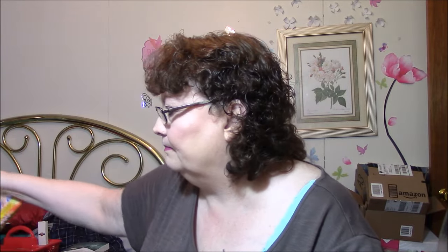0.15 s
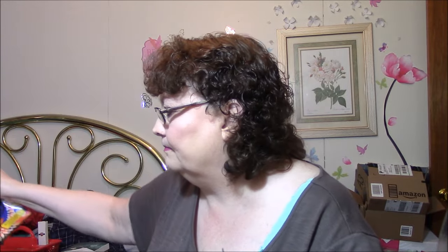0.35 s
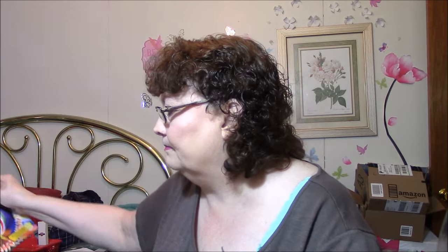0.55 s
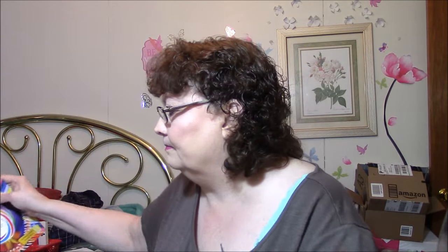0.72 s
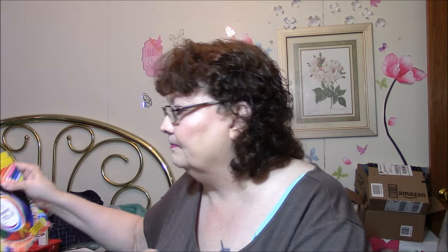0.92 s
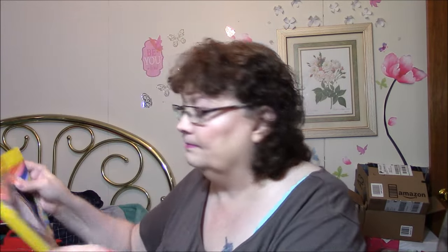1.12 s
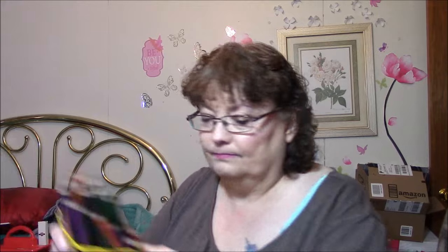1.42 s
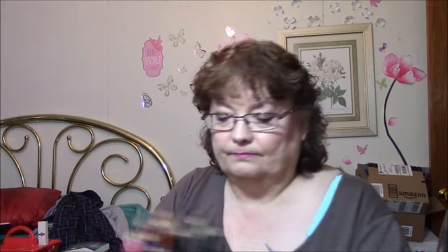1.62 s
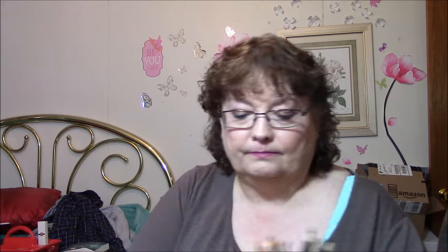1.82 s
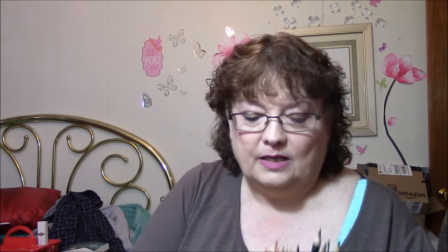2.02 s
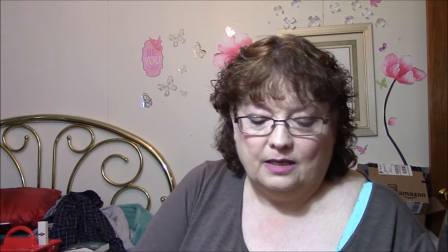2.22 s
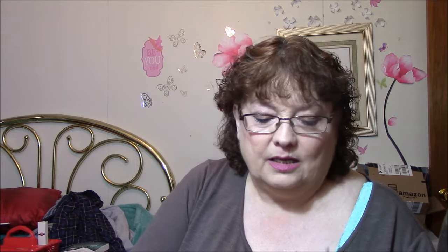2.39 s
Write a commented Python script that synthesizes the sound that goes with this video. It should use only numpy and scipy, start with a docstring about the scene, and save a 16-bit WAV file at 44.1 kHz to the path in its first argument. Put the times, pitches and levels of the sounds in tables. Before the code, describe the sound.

Wooden pencils knock softly in a scuffing pack for the first 0.3 seconds. A lull follows, with faint sleeve rustle and low room rumble. A soft bump comes at 1.2 seconds, then sharp plastic ticks from 1.4 as the pencils slide out and jostle. They clack loudest, close to the microphone, from 2.1 to 2.3 seconds, with a few lighter clicks around 2.5.

```python
"""Picking up a pack of pencils

At arm's length a pack of wooden pencils is dragged off a pile and lifted, with one soft bump.
Its plastic ticks; close to the microphone the pencils slide out, jostle and clack in the hand.
A small furnished room answers, over a low rumble, a rustling sleeve and a faint electrical whine."""
import sys
import numpy as np
from scipy import signal
from scipy.fft import rfft, irfft, next_fast_len
from scipy.io import wavfile
from scipy.ndimage import uniform_filter1d, map_coordinates

SR = 44100
rng = np.random.default_rng(int(sys.argv[2]) if len(sys.argv) > 2 else 0)


def generate_wav(signal):
    """Clip the signal to [-1, 1] and save it as 16-bit WAV at the path in sys.argv[1]."""
    frames = np.transpose(np.atleast_2d(signal))
    scaled = np.clip(frames, -1, 1) * 32767
    pcm = np.round(scaled).astype(np.int16)
    wavfile.write(sys.argv[1], SR, pcm)


N = 112454
TIME = np.arange(N) / SR
RING = np.arange(SR // 4) / SR  # seconds since a blow
FLOOR_DB = -53.5
PACK_MODE_WIDTH = 0.024  # fraction of a mode's frequency

# bending modes of a pencil: pitch_hz, level_db, t60_s
PENCIL_MODES = [(399, -17.5, 0.031), (888, -14.5, 0.068), (1380, -1, 0.024), (2539, -7.5, 0.033),
                (3540, -13, 0.021), (4570, -33, 0.016), (6590, -16.5, 0.021)]
# modes of the pack with the pencils inside: pitch_hz, level_db, t60_s
PACK_MODES = [(420, -5.5, .07), (925, -3, 0.063), (1650, -4.5, 0.052), (2625, -1, 0.051),
              (6770, -16.5, 0.033), (7500, -21, 0.03), (9730, -21, .03)]
# friction noise of the pack: frequency_hz, level_db
SCUFF_SPECTRUM = [(60, -30), (217, -3), (950, -4.5), (2700, -8), (5500, -18.5), (7500, -23.5), (16000, -40)]
# the room's low rumble: frequency_hz, level_db
FLOOR_SPECTRUM = [(25, -31.5), (125, -4), (330, -8.5), (1400, -19.5), (3100, -27), (6000, -29),
                  (16000, -43.5)]


def amp(db):
    return 10 ** (np.asarray(db) / 20)


def unit(x):
    return x / np.sqrt(np.mean(x ** 2) + 1e-20)


def fade(t, t60):
    """Falls by 60 dB in t60."""
    return np.exp(-np.log(1000) * t / np.maximum(t60, 1e-4))


def onset(t, rise_s=0.00015):
    """Wood gives a little as it is struck."""
    return 1 - np.exp(-t / rise_s)


def along(points, hz):
    """Interpolates (frequency_hz, value) points on a log axis."""
    f, v = np.transpose(points)
    return np.interp(np.log(hz + 1), np.log(f + 1), v)


def level(rows):
    """Gain per sample from (time_s, level_db) points."""
    return amp(np.interp(TIME, *np.transpose(rows)))


def filtered(x, response):
    """Applies a frequency response to x."""
    n = x.shape[-1]
    padded = next_fast_len(n + 4096)
    return irfft(rfft(x, padded) * response(np.fft.rfftfreq(padded, 1 / SR)), padded)[..., :n]


def noise(spectrum, size=N):
    """Coloured noise of rms 1."""
    return unit(filtered(rng.standard_normal(size), lambda hz: amp(along(spectrum, hz))))


def grain(rate, depth_db):
    """A random gain of rms 1, with rate knots a second."""
    knots = rng.standard_normal(int(N * rate / SR) + 4)
    return unit(amp(depth_db * map_coordinates(knots, [TIME * rate])))


def add(track, start_s, sound):
    i = int(np.clip(round(start_s * SR), 0, N))
    track[i:i + len(sound)] += sound[:N - i]


def tilt(hz, bright_db):
    """Gain of a slope in dB per octave around a pencil's main mode."""
    return amp(bright_db * np.log2(np.clip(hz, 700, 7000) / 1400))


def resonance(modes, peak_db, width):
    """A flat response plus a peak of relative width at each mode."""
    return lambda hz: 1 + amp(peak_db) * sum(1 / (1 + ((hz / f - 1) / width) ** 2) for f, _, _ in modes)


def ringing(modes, pitch, bright_db, t, scatter=0.041):
    """Each blow meets another pencil or another spot, so every mode shifts a little."""
    hz, db, t60 = np.transpose(modes)[:, :, None]
    signs = (-1) ** np.arange(len(hz))[:, None]
    gains = amp(db + rng.uniform(-2, 2, hz.shape)) * tilt(hz, bright_db) * signs
    shifted_hz = hz * pitch * (1 + scatter * rng.uniform(-1.01, 1, hz.shape))
    return np.sum(gains * np.sin(2 * np.pi * shifted_hz * t) * fade(t, t60), axis=0)


def rumble(gain_db=0):
    """Steady room tone, mostly bass."""
    return amp(FLOOR_DB + gain_db) * noise(FLOOR_SPECTRUM)


def whine(pitch_hz=5575):
    """A thin electrical whine comes and goes unevenly."""
    # spells of whine: start_s, end_s, level_db
    spells = [(0.234, 0.374, -65), (0.583, 0.649, -60.5), (0.718, .79, -62), (0.85, .92, -62.5),
              (1.115, 1.259, -66)]
    gate = sum(amp(db) * ((TIME >= start) & (TIME < end)) for start, end, db in spells)
    tone = np.sin(2 * np.pi * pitch_hz * TIME)
    return uniform_filter1d(gate, size=300) * tone * grain(rate=30, depth_db=1)


def room(x, tail_db=-15.5, walls_db=-11.5):
    """A small furnished room: echoes off near walls and a short diffuse tail."""
    # decay of the room: frequency_hz, t60_s
    decay = [(150, 0.39), (4000, 0.14), (12000, 0.033)]
    hz, t, bands = signal.stft(rng.standard_normal(SR // 2), SR, nperseg=256)
    tail = signal.istft(bands * fade(t, along(decay, hz)[:, None]), SR, nperseg=256)[1]
    walls = np.zeros(len(tail))
    for when, strength in rng.uniform(-1, 1, (12, 2)):
        delay_s = 0.002 + abs(when) * 0.02
        walls[int(delay_s * SR)] += strength
    late = amp(tail_db) * np.roll(tail, SR // 200) / np.linalg.norm(tail)
    early = amp(walls_db) * walls / np.linalg.norm(walls)
    return signal.fftconvolve(x, late + early)[:N]


def sleeve():
    """Cloth rustles as the arm moves."""
    # swell of the rustle: time_s, level_db
    movement = [(.48, -52.5), (.68, -66.5), (.84, -53.5), (.96, -78)]
    # rubbing cloth: frequency_hz, level_db
    cloth = [(30, -28), (130, -2.5), (2600, -14), (16000, -50)]
    return level(movement) * noise(cloth) * grain(rate=40, depth_db=1.5)


def pack_scuffs():
    """The pack scuffs over the pile, then its plastic flexes briefly; both excite its modes."""
    # scuffs and the closing flex: peak_s, level_db, rise_s, t60_s
    strokes = [(0.026, -33.5, 0.073, 0.31), (0.065, -33, 0.015, 0.22), (0.131, -37, 0.013, 0.27),
               (0.187, -34.5, 0.022, 0.21), (0.771, -45.5, 0.0031, 0.28), (1.45, -34, .002, 0.085)]
    power = np.zeros(N)
    for peak_s, db, rise_s, t60 in strokes:
        swell = np.exp(np.minimum(TIME - peak_s, 0) / rise_s)
        power += (amp(db) * swell * fade(np.maximum(TIME - peak_s, 0), t60)) ** 2
    body = resonance(PACK_MODES, peak_db=-5.5, width=PACK_MODE_WIDTH)
    rasp = unit(filtered(noise(SCUFF_SPECTRUM), body))
    return np.sqrt(power) * rasp * grain(rate=500, depth_db=3)


def pack_knocks(grit_db=-1.5):
    """Pencils knock inside the pack and ring it, each with a burst of contact noise."""
    # knocks: start_s, level_db, brightness_db_per_octave
    knocks = [(.022, -31.5, -3), (0.06, -35, 5.5), (.066, -30, -1.5), (0.075, -34, -2), (0.13, -43, 8.5),
              (.187, -29, 0), (.299, -45, -8), (0.768, -47.5, 4.5), (1.46, -33, -2)]
    out = np.zeros(N)
    for start_s, db, bright_db in knocks:
        grit = filtered(noise(SCUFF_SPECTRUM, size=len(RING)), lambda hz: tilt(hz, bright_db))
        grit *= amp(grit_db) * fade(RING, t60=0.018)
        pitch = 1 + PACK_MODE_WIDTH * rng.uniform(-0.63, 0.69)
        ring = ringing(PACK_MODES, pitch, bright_db, RING)
        add(out, start_s, amp(db) * (ring + grit) * onset(RING))
    return out


def pack_thump(start_s=1.222, gain_db=-24.5):
    """A soft blow against the pack rings only low modes."""
    # low modes: pitch_hz, level_db, t60_s
    modes = [(307, 2, 0.048), (192, -15.5, 0.12)]
    ring = sum(amp(db) * np.sin(2 * np.pi * hz * RING) * fade(RING, t60) for hz, db, t60 in modes)
    out = np.zeros(N)
    add(out, start_s, amp(gain_db) * ring * onset(RING, rise_s=0.0032))
    return out


def ticks_and_taps(mode_spacing=0.101, crack_db=-7):
    """Plastic ticks and pencil tips ring briefly: a burst of noise and three close modes each."""
    # plastic ticks and taps of pencil tips: start_s, level_db, pitch_hz, t60_s
    ticks = [(.625, -47, 8930, 0.013), (1.421, -27, 7540, 0.0069), (1.447, -19.5, 11900, 0.003),
             (1.4506, -19, 7500, 0.0059), (1.4595, -19, 7050, 0.0038), (1.539, -30.5, 6650, 0.0072),
             (1.572, -28.5, 6900, 0.019), (1.6015, -18.5, 10540, 0.0053), (1.627, -27, 2226, 0.046),
             (2.0682, -20, 2460, 0.06), (2.1143, -23, 6660, 0.037)]
    out = np.zeros(N)
    for start_s, db, hz, t60 in ticks:
        ring = np.zeros(len(RING))
        for k in (-1, 0, 1):
            cycles = hz * (1 + k * mode_spacing) * RING + abs(k) * rng.random()
            ring += np.sin(2 * np.pi * cycles) / (1 + 2 * abs(k))
        crack = unit(filtered(rng.standard_normal(len(RING)), lambda f: f / hz / (1 + (f / hz) ** 3)))
        crack *= amp(crack_db) * fade(RING, t60=0.006)
        add(out, start_s, amp(db) * (ring * fade(RING, t60) + crack))
    return out


def pencil_scrape():
    """Uneven friction keeps the pencils' high modes ringing as they leave the pack."""
    # course of the slide: time_s, level_db
    slide = [(1.49, -74), (1.555, -48), (1.66, -47), (1.72, -67)]
    # scraped resonances: pitch_hz, width_hz, level_db
    modes = [(2365, 120, 2.5), (4340, 110, -3.5), (6800, 130, -6)]

    def response(f):
        return sum(amp(db) * 1j * f * width / (hz ** 2 - f ** 2 + 1j * f * width)
                   for hz, width, db in modes)

    slips = rng.standard_normal(N) * grain(rate=150, depth_db=4)
    sliding = (TIME > slide[0][0]) & (TIME < slide[-1][0])
    return sliding * level(slide) * unit(filtered(slips, response))


def pencil_contact(pitch, bright_db, size, crack_db=-4.5):
    """Wood meets wood: a brief crack and a pencil's bending modes."""
    # contact noise: frequency_hz, level_db
    crack_spectrum = [(120, -23), (700, -12), (1500, 10.5), (3000, -4.5), (7000, -9), (16000, -47)]
    t = RING[:size]
    ring = ringing(PENCIL_MODES, pitch, bright_db, t)
    crack = filtered(noise(crack_spectrum, size), lambda hz: tilt(hz, bright_db)) * fade(t, t60=0.02)
    return (ring + amp(crack_db) * crack) * onset(t)


def pencil_jostle(contacts_per_s=230, scatter_db=4, contacts_db=-1.5, rub_db=-2, pitch_spread=0.047):
    """Many glancing contacts between pencils of unequal length, over their smooth sliding."""
    # how hard the bundle is stirred: time_s, level_db
    stir = [(1.357, -64), (1.376, -44), (1.66, -44.5), (1.708, -47.5), (1.724, -35.5), (1.82, -38.5),
            (1.88, -42), (2.05, -31), (2.11, -27.5), (2.14, -27), (2.17, -23.5), (2.24, -27.5),
            (2.285, -27), (2.33, -34.5), (2.37, -47), (2.42, -49), (2.47, -38), (2.55, -32.5)]
    # wood sliding on wood: frequency_hz, level_db
    rub_spectrum = [(60, -25.5), (330, 2), (700, -2), (1500, -5.5), (3000, -8), (9000, -16), (16000, -33.5)]
    body = resonance(PENCIL_MODES, peak_db=-3, width=0.026)
    rub = unit(filtered(noise(rub_spectrum), body)) * grain(rate=200, depth_db=2.2)
    soft_start = onset(RING[:2048], rise_s=0.0005)
    pitches = np.exp(pitch_spread * np.linspace(-2, 2, 32))
    pencils = [soft_start * pencil_contact(pitch, bright_db=1, size=2048) for pitch in pitches]
    contacts = np.zeros(N)
    for k, (slip, which, force) in enumerate(rng.random((int(contacts_per_s * N / SR), 3))):
        gain = amp(scatter_db * min(-np.log(force), 2))
        add(contacts, (k + 2 * slip) / contacts_per_s, gain * pencils[int(which * len(pencils))])
    return level(stir) * (amp(contacts_db) * unit(contacts) + amp(rub_db) * rub)


def hand_bump():
    """The bundle lands dully against the hand."""
    # bump: start_s, level_db
    bumps = [(2.27, -23)]
    # its dull noise: frequency_hz, level_db
    spectrum = [(60, -28), (300, 8), (900, 4), (1400, -42)]
    out = np.zeros(N)
    for start_s, db in bumps:
        add(out, start_s, amp(db) * noise(spectrum, size=len(RING)) * fade(RING, t60=0.2))
    return out


def pencil_clacks(snap_hz=4400, snap_db=-1):
    """Close to the microphone pencil strikes pencil; each hard blow opens with a snap."""
    # blows: start_s, level_db, pitch_ratio, brightness_db_per_octave
    blows = [(1.6241, -25, 0.91, 1.5), (1.714, -30.5, 0.91, 1), (1.740, -30, 1.13, -9),
             (1.789, -25.5, 1.01, 1), (1.836, -25, 0.92, -1.5), (1.929, -37, 0.86, 6.5),
             (1.96, -34, 1.03, 6), (2.0766, -13.5, 1.05, -3), (2.09, -4, 0.99, -2), (2.1553, -6, 1.04, 0),
             (2.202, -13, 1.07, 0), (2.2577, -12, 1.22, 3), (2.2616, -12, 0.97, 3.5),
             (2.269, -7.5, 0.97, -3), (2.274, -8.5, 1.016, -1.5), (2.2835, -9.5, 1.155, -1.5),
             (2.3253, -16.5, 1.05, -3.5), (2.4845, -23, 0.95, 0.5), (2.503, -22.5, 1.04, -12)]
    snap = amp(snap_db) * np.sin(2 * np.pi * snap_hz * RING) * fade(RING, t60=0.0019) * onset(RING)
    out = np.zeros(N)
    for start_s, db, pitch, bright_db in blows:
        add(out, start_s, amp(db) * pencil_contact(pitch, bright_db, size=4096))
        add(out, start_s, amp(db) * tilt(snap_hz, bright_db) * snap)
    return out


def low_cut(hz, corner_hz=137):
    """The microphone's second-order bass roll-off."""
    s = 1j * hz / corner_hz
    return s ** 2 / (1 + np.sqrt(2) * s + s ** 2)


def scene():
    """Everything reaches two closely spaced capsules, which hear the room a little differently."""
    # stereo width: frequency_hz, side_gain_db
    width = [(1300, -36.5), (6000, -21), (13000, -36)]
    handling = pencil_clacks() + hand_bump() + pack_thump() + pack_scuffs() + pack_knocks()
    handling = filtered(handling + pencil_scrape() + pencil_jostle(), low_cut)
    ticks = filtered(ticks_and_taps(), low_cut)
    direct = handling + ticks
    into_room = handling + amp(-2.5) * ticks  # the ticks are close, so the room answers them less
    mid = direct + room(into_room) + whine() + rumble() + sleeve()
    quarter_cycle_ahead = filtered(direct, lambda hz: 1j)
    diffuse = amp(5) * unit(room(into_room)) * direct.std()
    side = filtered(quarter_cycle_ahead + diffuse, lambda hz: amp(along(width, hz))) + rumble(gain_db=-7)
    return np.array([mid + side, mid - side])


def record(dry, top_hz=15900):
    """The recorder keeps nothing above its band limit."""
    return filtered(dry, lambda hz: hz < top_hz)


dry = scene()
out = record(dry)
generate_wav(out)
```